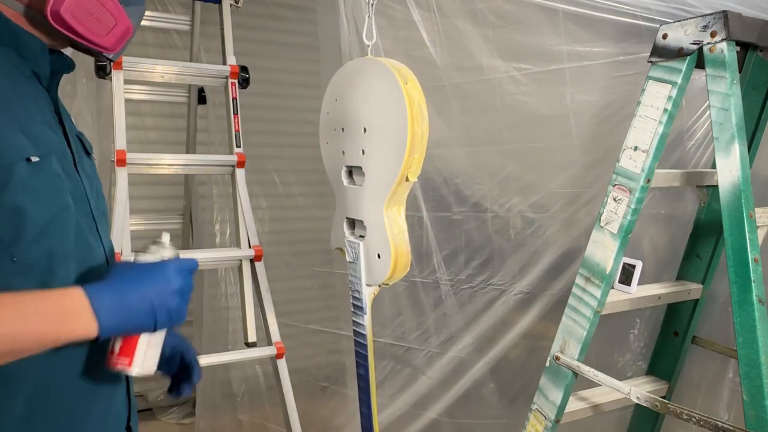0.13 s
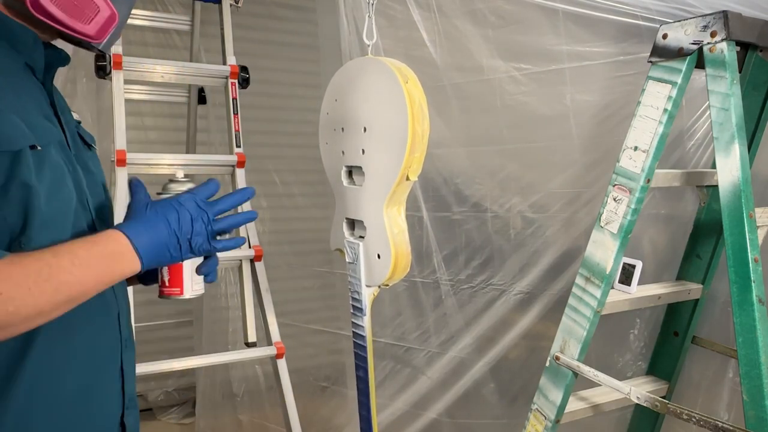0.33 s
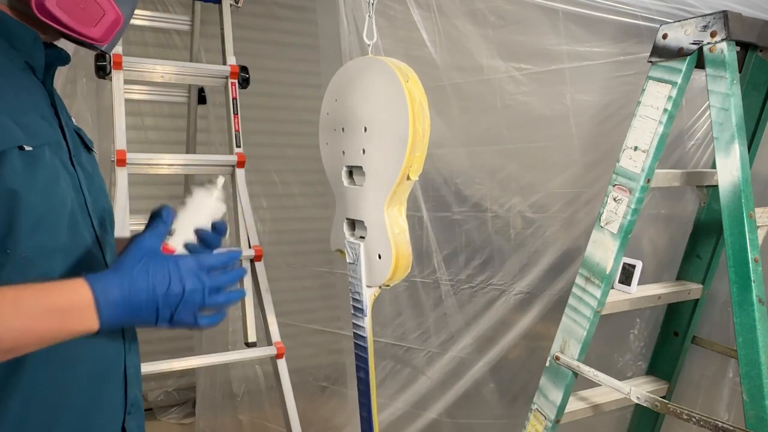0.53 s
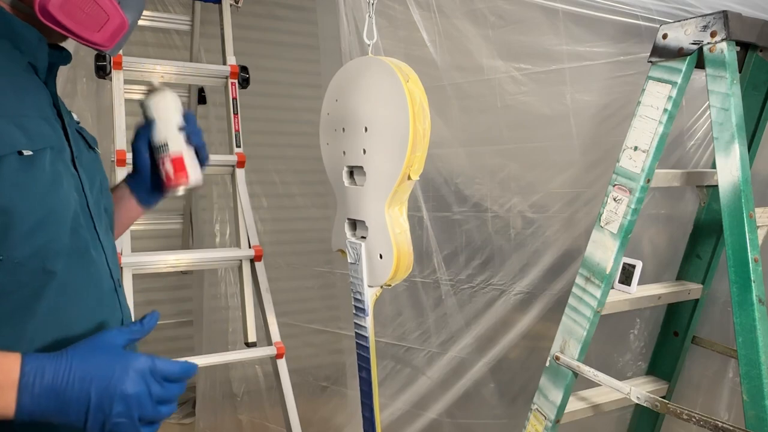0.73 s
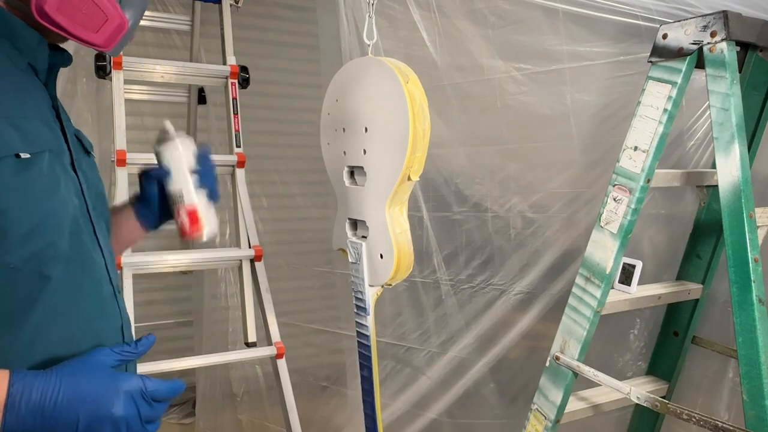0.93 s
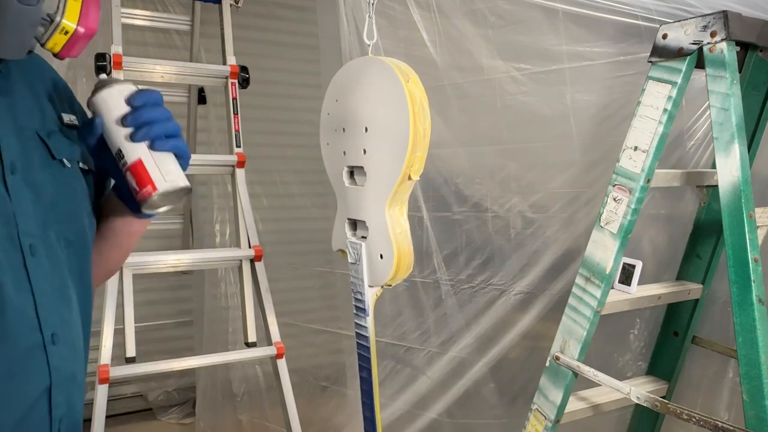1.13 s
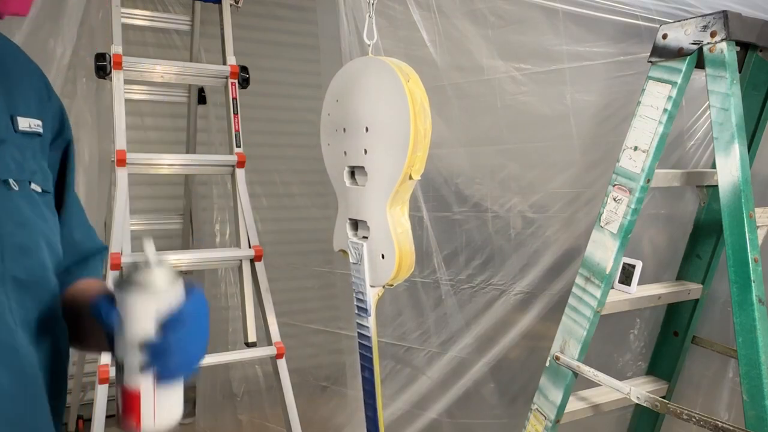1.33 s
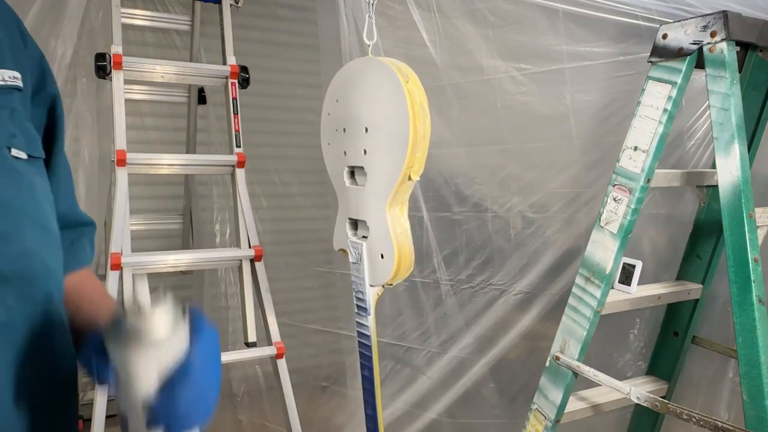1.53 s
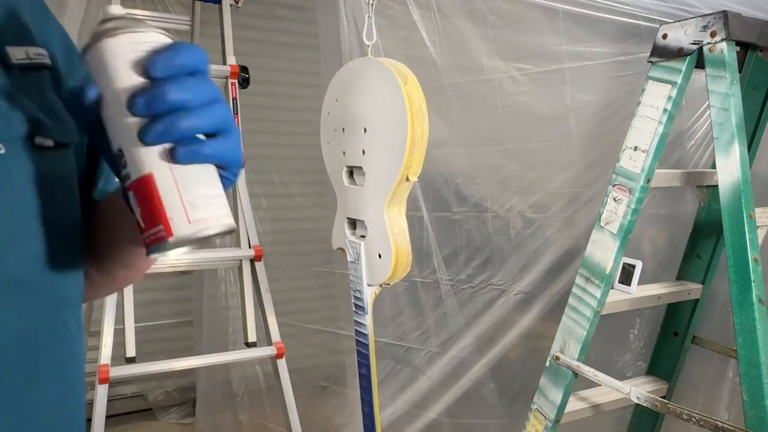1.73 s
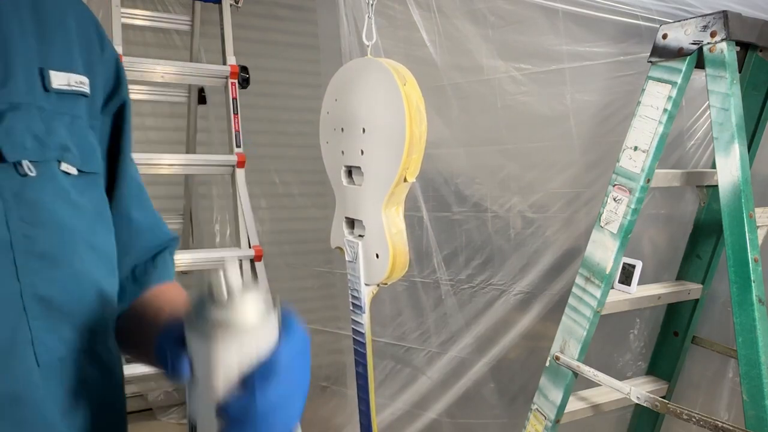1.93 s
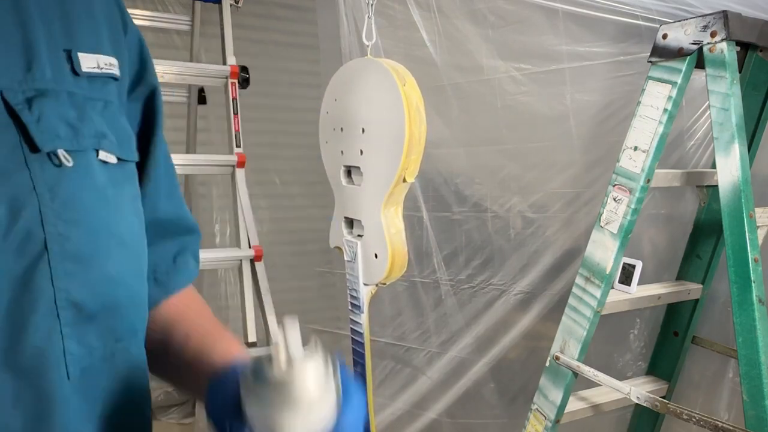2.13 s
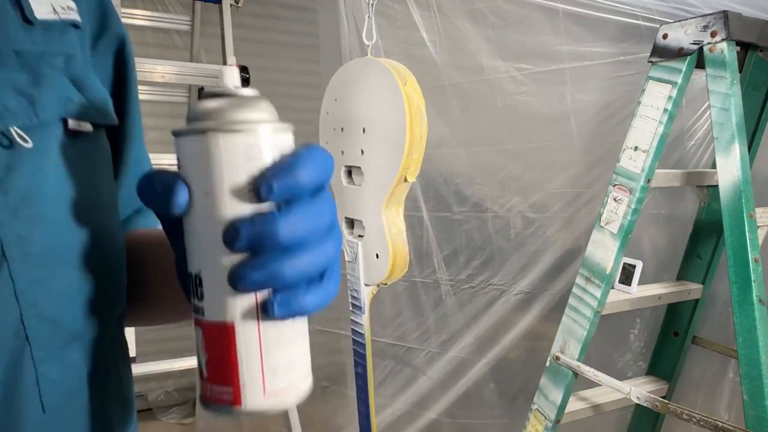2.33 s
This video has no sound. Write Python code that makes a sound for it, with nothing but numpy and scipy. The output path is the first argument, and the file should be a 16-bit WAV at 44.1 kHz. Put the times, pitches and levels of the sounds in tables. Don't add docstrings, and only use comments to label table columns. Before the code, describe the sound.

A spray can's mixing ball clacks a few times, fades to light ticks, then rattles hard and fast until the end, close and left of a stereo microphone, in a small room with low fan hum.

```python
import sys
import numpy as np
from scipy import signal
from scipy.fft import rfft, irfft, next_fast_len
from scipy.io import wavfile
from scipy.ndimage import uniform_filter1d

SR = 44100
rng = np.random.default_rng(int(sys.argv[2]) if len(sys.argv) > 2 else 0)


def boost(x):
    u = np.asarray(x, float) / 20
    return 10 ** u


def store_pcm(level_fs):
    pcm = np.round(np.clip(level_fs, -1, 1) * 32767).astype(np.int16)
    wavfile.write(sys.argv[1], SR, np.atleast_2d(pcm).T)


N = 109676
LEAD = 2048

# start in seconds, peak in dB, strongest wall mode in Hz, body over
# wall in dB, rim ping over wall in dB.
BLOWS = [(0.022, -14.5, 3750, -8, -23), (0.1292, -15.5, 4320, -16, -2.5),
         (0.1422, -12.5, 5240, -14, -27), (0.1606, -16.5, 4000, -19, -14),
         (0.9104, -7, 4740, -19, -6.5), (0.912, -7, 6410, -32, -6), (0.9185, -19, 4560, -30, -23),
         (1.0467, -9, 5080, -9.5, -4.5), (1.0515, -9.5, 5970, -15, -7), (1.2108, -11, 3720, -30, -9),
         (1.2178, -7, 3570, -29, -37), (1.229, -9, 4000, -16.5, -36), (1.337, -8.5, 5010, -12.5, 0.5),
         (1.3472, -8.5, 5150, -6, -7.5), (1.4977, -5, 4170, -13, -20.5),
         (1.5129, -20.5, 6940, -8, -13), (1.5315, -7.5, 3605, -22, -21), (1.5637, -16, 6950, -18, -7),
         (1.6506, -9, 6300, -8, -8), (1.6565, -17.5, 3770, -5, 0), (1.6731, -10, 5840, -8.5, -6.5),
               (1.7179, -7.5, 7570, -15, -12.5), (1.7907, -4, 3760, -26, -12), (1.8096, -9, 4410, -12, -10),
               (1.8178, -10, 3430, -19, -5), (1.938, -9, 5760, -3, -3), (1.942, -8, 7700, -9, -4),
               (1.944, -14.5, 5380, 0, -23), (2.0626, -7, 3830, -18.5, -23), (2.0772, -5.5, 3970, -22, -2),
               (2.0779, -9, 8040, -11, -8), (2.0921, -16.5, 8360, -5, -8), (2.1001, -14.5, 3340, -4.5, -31),
               (2.1123, -36, 2790, -7, -15), (2.2275, -10.5, 6110, -1.5, -3),
               (2.2446, -12.5, 4400, -4, -7.5), (2.3652, -3, 4060, -18, -28), (2.391, -10, 2955, -14, 1.5)]
EARLIER_BLOW = (-.022, -8, 4200, -12, -12)
# start in seconds, peak in dB, strongest wall mode in Hz, body over wall in dB.
TAPS = [(0.0651, -27, 5170, 0), (0.29, -32, 6330, -3), (0.3472, -36.5, 6660, -0.5),
        (0.5228, -24, 6370, -8), (0.5355, -23.5, 3720, -3), (0.5569, -25, 6160, -32),
        (0.64, -21, 6050, -31), (0.7053, -34, 6200, 5.5), (0.756, -27.5, 2370, -2),
        (0.7903, -26.5, 2580, 4.5), (0.8461, -33, 6160, 3), (0.9884, -21.5, 6070, -0.5),
        (1.017, -21.5, 7880, -12.5),
        (1.1468, -23, 7860, -1), (1.1666, -22.5, 6030, -38), (1.2646, -39, 2450, -15),
              (1.292, -25.5, 5840, -10), (1.3085, -24, 6200, -28), (1.588, -21, 3770, 0),
              (1.7526, -29.5, 6650, 9.5), (1.8777, -22.5, 8170, 0.5), (2.006, -27, 4050, 7),
              (2.0208, -21, 2350, 7), (2.171, -20.5, 7700, 0), (2.2322, -21, 6100, -4),
              (2.3076, -23, 4270, 4), (2.4105, -37, 5940, 10), (2.4797, -24, 7900, 4.5),
        (.7751, -61, 6000, 5), (0.818, -40, 4140, -3), (0.853, -36, 4000, 7), (0.869, -33.5, 6240, 7),
         (0.883, -38, 3870, 1), (1.0101, -24.5, 4260, -1.5), (1.1343, -28.5, 6330, -6),
         (1.394, -36.5, 2970, 11), (1.418, -31, 5930, 0), (1.427, -31, 6040, 0.5), (1.452, -34.5, 7600, 0),
         (1.463, -49, 2400, 2), (2.0752, -35, 7800, -26), (2.0914, -14, 4300, -22), (2.103, -33, 3540, -15),
         (2.251, -17.5, 7060, -12)]
# start in seconds, peak in dB, mode in Hz.
KNOCKS = [(0.1309, -19.5, 1390), (0.161, -25.5, 1400), (0.5281, -24.5, 1610), (0.7554, -30, 1410),
          (0.7751, -42, 1050), (0.7901, -30.5, 990), (0.8522, -30, 1420), (1.0529, -21, 1570),
          (1.135, -38, 1110), (1.1465, -40, 1090), (1.2121, -38, 964), (1.2642, -28, 1210),
          (1.2918, -29.5, 1030), (1.4165, -39, 1140), (1.5337, -27.5, 1130), (1.5888, -32, 1290),
          (1.6127, -31, 1300), (1.6506, -29, 990), (1.6712, -24.5, 1640), (1.716, -29, 1140),
          (1.8776, -34, 950), (1.91, -33, 1280), (1.943, -14.5, 1504), (2.0068, -28, 1470),
          (2.021, -37, 1135), (2.0629, -22, 1310), (2.0775, -23.5, 1430), (2.0998, -30, 1270),
          (2.115, -31, 1290), (2.146, -35, 1270), (2.162, -29, 1310), (2.1855, -28, 1500),
          (2.2277, -17, 1660), (2.2479, -18.5, 1560), (2.3074, -27.5, 1330), (2.412, -33, 1250),
          (2.4545, -29, 1390), (2.4804, -43, 1250)]

# frequency in Hz, level in dB.
WALL_MODES = [(2750, -5.5), (3350, -5.5), (4050, -7), (4700, -6.5), (5400, -19.5), (6250, -0.5), (7000, 2),
              (8100, -3.5), (9300, -11)]
BODY_MODES = [(480, -11), (820, -7), (1080, -2.5), (1300, -1.5), (1550, -2), (1950, -8)]
RIM_MODES = [(12300, 3.8), (13300, 2.6), (14300, 1.7), (15200, 2)]

# time in seconds, level in dB.
ROLL_EFFORT = [(0, -29.5), (.2, -39.5), (.35, -49.5), (.515, -64), (0.524, -32), (.62, -51.5), (.88, -49.5),
               (1.0, -39.5), (1.2, -45.5), (1.45, -43), (1.63, -42.5), (1.9, -46), (2.2, -39), (2.34, -56),
               (2.48, -35.5)]
# frequency in Hz, gain in dB.
ROLL_COLOUR = [(250, 0), (1400, 13.5), (2200, 17.5), (4000, 11.5), (6300, 15.5), (14500, 0.5)]

# frequency in Hz, T60 in seconds.
ROOM_T60 = [(300, 0.47), (1200, 0.33), (5500, 0.23), (14600, 0.16)]
# frequency in Hz, left over right in dB.
LEFT_OVER_RIGHT = [(150, 0.33), (400, 5.6), (2200, 0.18), (6500, 5.3), (12000, 0.069)]

# start in seconds, frequency in Hz, level in dB, T60 in seconds.
GLOVE_PAT = (1.612, 245, -33, .05)
# centre in seconds, half length in seconds, level in dB.
SLEEVE_RUBS = [
    (0.7, 0.17, -59),
    (1.661, 0.02, -45.5),
    (1.893, 0.027, -51.5),
    (2.202, 0.072, -55.5),
]

# frequency in Hz, density in dB per Hz.
FAN_COLOUR = [(18, -36), (30, -56), (48, 7.5), (65, 8.5), (187, -21.5), (400, -31.5), (520, -23),
              (880, -120)]
AIR_COLOUR = [(200, -11), (1200, -14), (2500, -30), (6300, -20.5), (15000, -38)]
# time in seconds, level in dB.
FAN_LOAD = [(0, -47), (.12, -43.5), (1.05, -45), (1.45, -46), (1.53, -40), (1.75, -40.5), (1.85, -47),
            (2.48, -48)]

# frequency in Hz, gain in dB.
SUM_RESPONSE = [(7800, 1.25), (9300, -3), (10000, -4.5), (11600, -9), (12400, -2.5), (13500, -2),
                (15700, 2.5), (16200, -22)]
DIFFERENCE_RESPONSE = [(7000, 1), (9500, -3.5), (13200, 0.5), (14200, -29)]

MAIN_T60_S, WALL_T60_S, BODY_T60_S, RIM_T60_S = .007, .005, .011, .005
RISE_S, RIM_RISE_S = .001, .0005
MODE_SPREAD, MODE_CHANCE_DB, PORT_DIFFER_DB = .05, 2.5, 2.5
WALL_DB, BODY_DB, RIM_DB, TAP_RIM_DB = 4.5, -6, 4, -12.5
KNOCK_DB, KNOCK_T60_S = 6, .013
ALL_ROUND_SHORTER = .3
ROLL_DB, ROLL_GRAINS_PER_S, ROLL_GRAIN_DB = -4.5, 2400, -1.5
SPLASH_DB, SPLASH_T60_S = -20.5, .052
LEAD_IN_DB, LEAD_IN_T60_S = -18.5, .015
RIGHT_LAG_S = .000208
ROOM_DB, EARLY_DB, EARLY_T60_S = -9.5, -16, .0083
FAN_DB, FAN_SWELL_DB, AIR_DB = -1, -1, -61.5
GATE_LOW_HZ, GATE_HIGH_HZ, GATE_DB, GATE_UNDER_DB = 9700, 12400, -83, -16.5
DUCK_S, DUCK_DB, DUCK_BACK_S = .978, -14, .02
LIMIT = .93


def read(points, hz):
    f, value = np.transpose(points)
    return np.interp(np.log(hz + 1), np.log(f + 1), value)


def evened(x):
    return x / np.sqrt(np.mean(x ** 2) + 1e-20)


def coloured(x, points, lag_s=0.):
    length = x.shape[-1]
    size = next_fast_len(length + 512)
    hz = np.fft.rfftfreq(size, 1 / SR)
    delay = np.exp(-2j * np.pi * hz * lag_s)
    return irfft(rfft(x, size) * boost(read(points, hz)) * delay, size)[..., :length]


def smeared(power, t60_s):
    return signal.lfilter([.01], [1, -boost(-120 / t60_s / SR)], power)


def rounded_rise(t, rise_s):
    return 1 - np.exp(-(t / rise_s) ** 2)


def modes(table, t60_s, chance, t):
    hz, level_db = np.transpose(table)[:, :, None]
    detune, weight, lean, phase = chance[:len(table)].T[:, :, None]
    turn = 2 * np.pi * hz * (1 + MODE_SPREAD * detune) * t
    ring = boost(level_db + MODE_CHANCE_DB * weight - 60 * t / t60_s)
    heard = []
    for side in (1, -1):
        port_ring = ring * boost(side * PORT_DIFFER_DB * lean)
        heard.append((port_ring * np.sin(turn + side * .4 * phase)).sum(0))
    return np.array(heard)


def blow(peak_db, wall_hz, body_db, rim_db, chance, scale):
    t = np.arange(0, .03, 1 / SR)
    slow = rounded_rise(t, scale * RISE_S)
    quick = rounded_rise(t, scale * RIM_RISE_S)
    main = boost(-60 * t / MAIN_T60_S / scale) * np.sin(2 * np.pi * wall_hz * t)
    wall = slow * (main + modes(WALL_MODES, scale * WALL_T60_S, chance, t))
    body = slow * modes(BODY_MODES, scale * BODY_T60_S, chance[9:], t)
    rim = quick * modes(RIM_MODES, scale * RIM_T60_S, chance[15:], t)
    parts = [(wall, WALL_DB), (body, BODY_DB + body_db), (rim, RIM_DB + rim_db)]
    return sum(boost(peak_db + db) * x / abs(x).max() for x, db in parts) / np.sqrt(scale)


def knocks(scale):
    t, out = np.arange(0, .04, 1 / SR), np.zeros(N + LEAD)
    rise = rounded_rise(t, RISE_S * scale)
    for s, db, hz in KNOCKS:
        decay = boost(KNOCK_DB + db - 60 * t / KNOCK_T60_S / scale)
        ring = decay * rise * np.sin(2 * np.pi * hz * t)
        part = out[LEAD + round(s * SR):][:len(t)]
        part += ring[:len(part)] / np.sqrt(scale)
    return out


def ball():
    light = [tuple(row) + (TAP_RIM_DB,) for row in TAPS]
    rows = [EARLIER_BLOW] + BLOWS + light
    chance = np.clip(rng.standard_normal((len(rows), 20, 4)), -2, 2)
    out = np.zeros((2, 2, N + LEAD))
    for (s, *rest), luck in zip(rows, chance):
        sound = np.array([blow(*rest, luck, scale) for scale in (1, ALL_ROUND_SHORTER)])
        part = out[..., LEAD + round(s * SR):][..., :sound.shape[-1]]
        part += sound[..., :part.shape[-1]]
    return out + np.array([knocks(.92), knocks(ALL_ROUND_SHORTER)])[:, None]


def roll(blows):
    size = N + LEAD
    grains = boost(ROLL_GRAIN_DB * np.minimum(rng.exponential(1, size), 5))
    grains = grains * (rng.random(size) < ROLL_GRAINS_PER_S / SR)
    contacts = evened(grains * rng.standard_normal(size))
    noise = contacts + .5 * rng.standard_normal((2, size))
    t = (np.arange(size) - LEAD) / SR
    bed = boost(ROLL_DB + np.interp(t, *np.transpose(ROLL_EFFORT)))
    power = (blows ** 2).mean(0)
    splash = boost(SPLASH_DB) * np.sqrt(smeared(power, SPLASH_T60_S))
    scrape = boost(LEAD_IN_DB) * np.sqrt(smeared(power[::-1], LEAD_IN_T60_S)[::-1])
    return (bed + splash + scrape) * evened(coloured(noise, ROLL_COLOUR))


def ports(can):
    shadow = [(hz, -db) for hz, db in LEFT_OVER_RIGHT]
    return np.array([can[0], coloured(can[1], shadow, RIGHT_LAG_S)])


def room(x):
    length = SR // 2
    taps = np.zeros((2, length))
    at = np.arange(60, length - 20, 20) + rng.integers(0, 20, (2, (length - 61) // 20))
    np.put_along_axis(taps, at, rng.choice([-1., 1.], at.shape), 1)
    hz, t, z = signal.stft(taps, SR, nperseg=256)
    decay = boost(-60 * t / read(ROOM_T60, hz)[:, None])
    tail = signal.istft(z * decay, SR, nperseg=256)[1][:, :length]
    early = taps[::-1] * boost(-60 * np.arange(length) / SR / EARLY_T60_S)
    tail = boost(ROOM_DB) * tail / np.linalg.norm(tail[0])
    early = boost(EARLY_DB) * early / np.linalg.norm(early[0])
    return signal.fftconvolve(x, tail + early, axes=1)[:, :x.shape[1]]


def glove():
    s, hz, db, t60_s = GLOVE_PAT
    t = np.maximum(np.arange(N) / SR - s, 0)
    return boost(db - 60 * t / t60_s) * np.minimum(t / .0099, 1) * np.sin(2 * np.pi * hz * t)


def sleeve():
    t = np.arange(N) / SR
    level = sum(boost(db) * np.exp(-((t - s) / half) ** 2) for s, half, db in SLEEVE_RUBS)
    return level * evened(coloured(rng.standard_normal(N), [(150, -35), (560, -4.0), (1300, -33)]))


def workshop():
    noise, t = rng.standard_normal((5, N)), np.arange(N) / SR
    drifts = np.geomspace(.5, 8, num=12)
    swell = evened(sum(np.sin(2 * np.pi * (f * t + rng.random())) / np.sqrt(f) for f in drifts))
    fan = coloured(noise[0] + .091 * noise[1:3], FAN_COLOUR + [(800, -71)])
    power = uniform_filter1d((fan ** 2).mean(0), size=4000)
    fan = evened(fan / (power + 1e-12) ** .32)
    fan = fan * boost(FAN_DB + np.interp(t, *np.transpose(FAN_LOAD)) + FAN_SWELL_DB * swell)
    return fan + boost(AIR_DB) * evened(coloured(noise[3:], [(100, -47)] + AIR_COLOUR))


def scene():
    direct, all_round = ball()
    wet = roll(direct)
    can = ports(direct + wet) + room(ports(all_round + wet))
    return can[:, LEAD:] + glove() + sleeve() + workshop()


def gated(x):
    hz, _, z = signal.stft(x, SR, nperseg=512)
    band = (hz > GATE_LOW_HZ) & (hz < GATE_HIGH_HZ)
    below = (hz > GATE_LOW_HZ / 3) & (hz < GATE_LOW_HZ)
    power = uniform_filter1d(abs(z) ** 2, size=11, axis=0)
    louder = uniform_filter1d(power[below].mean(0), size=5)
    weak = power < np.maximum(boost(2 * GATE_DB), boost(2 * GATE_UNDER_DB) * louder)
    return signal.istft(z * ~(band[:, None] & weak), SR, nperseg=512)[1][:N]


def low_pass(x):
    return signal.sosfilt(signal.butter(12, 16820, fs=SR, output="sos"), x)


def record(dry):
    mid = gated(coloured((dry[0] + dry[1]) / 2, SUM_RESPONSE))
    side = coloured((dry[0] - dry[1]) / 2, DIFFERENCE_RESPONSE)
    since = np.arange(N) / SR - DUCK_S
    duck = boost(DUCK_DB * np.clip(since / .003, 0, 1) * np.exp(-abs(since) / DUCK_BACK_S))
    both = np.array([mid + side, mid - side]) * duck
    both = both / np.sqrt(np.sqrt(1 + (both / LIMIT) ** 4))
    return low_pass(both)


dry = scene()
out = record(dry)
store_pcm(out)
```